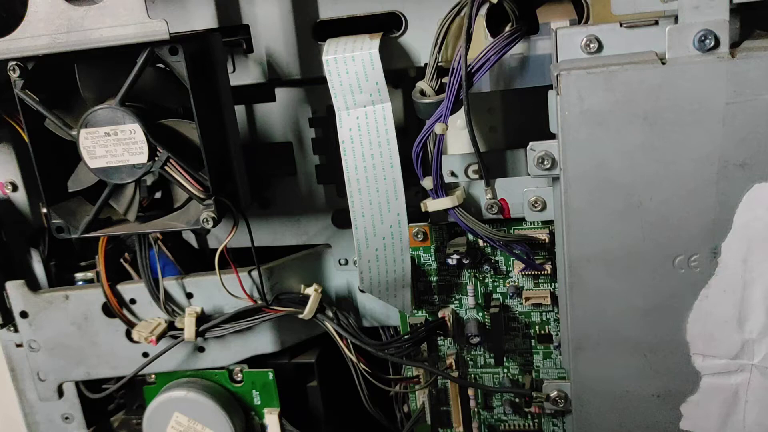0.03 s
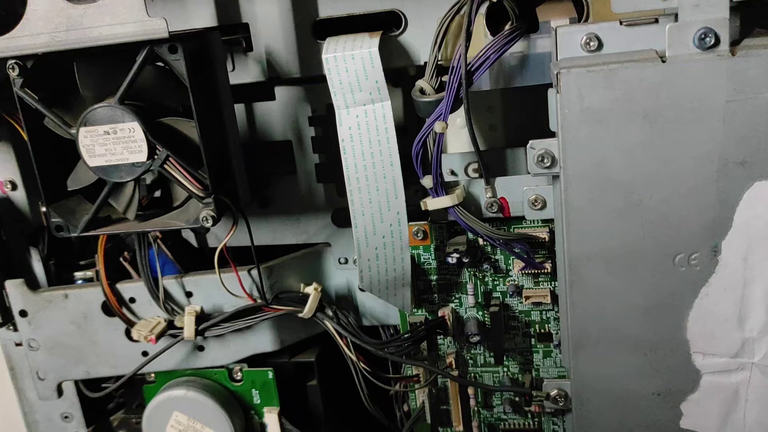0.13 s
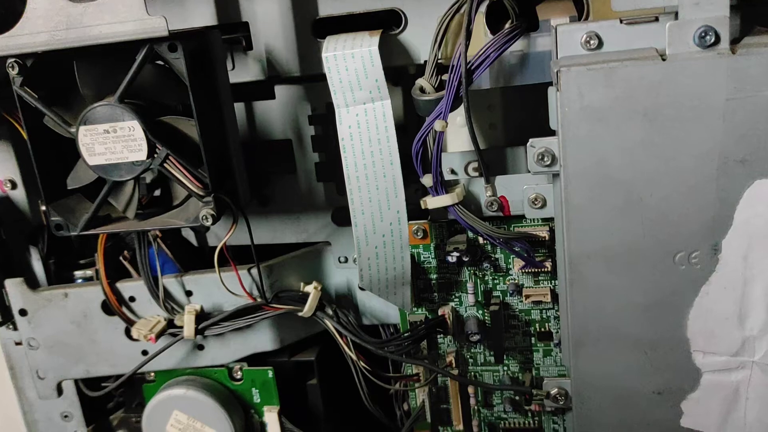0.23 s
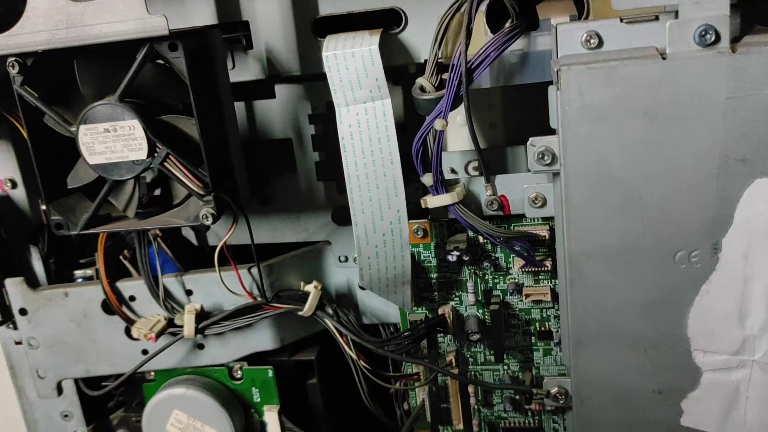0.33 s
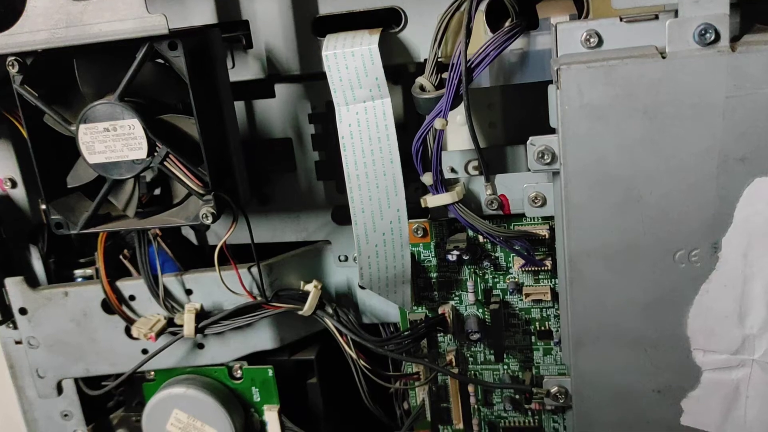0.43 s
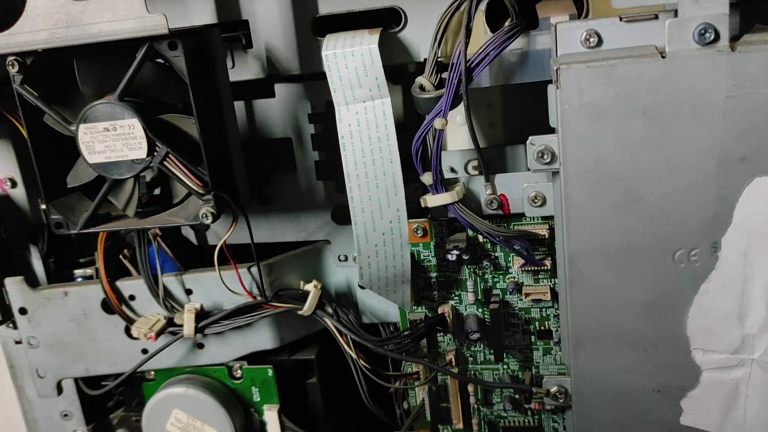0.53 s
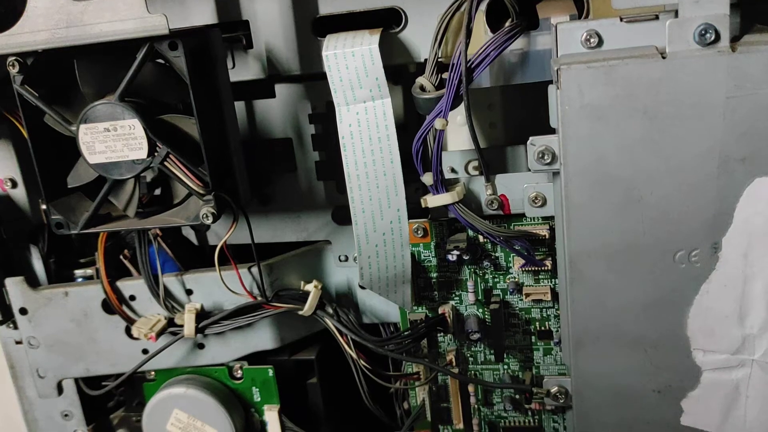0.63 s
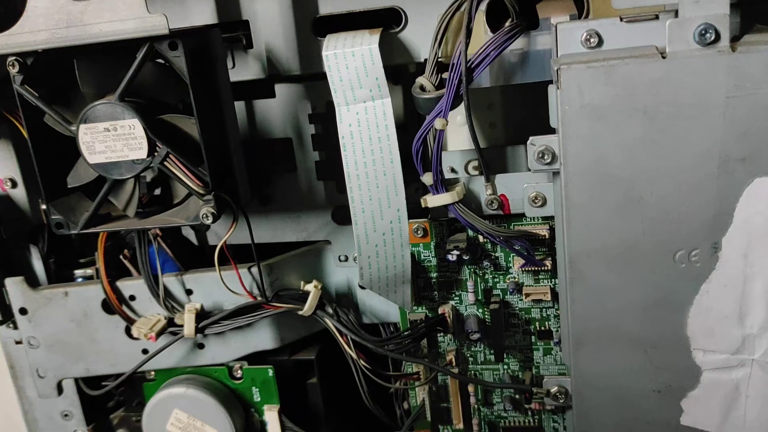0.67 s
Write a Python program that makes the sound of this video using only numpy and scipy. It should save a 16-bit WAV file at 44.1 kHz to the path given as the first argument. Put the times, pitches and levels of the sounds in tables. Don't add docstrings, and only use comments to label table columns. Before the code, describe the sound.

One loud mechanical clack with a brief dull shudder, then sparse ticks, soft taps and rubbing, a short rough slide with a bright click and hollow knocks, over steady fan hiss, heard close in a room.

```python
import sys
import numpy as np
from scipy import signal
from scipy.fft import rfft, irfft, next_fast_len
from scipy.io import wavfile
from scipy.ndimage import uniform_filter1d, map_coordinates

SR = 44100
rng = np.random.default_rng(int(sys.argv[2]) if len(sys.argv) > 2 else 0)


def rack_gain(trim_db):
    fader = np.asarray(trim_db, float)
    return 10 ** (fader / 20)


def wav_record(signal):
    frames = np.transpose(np.atleast_2d(signal))
    bounded = np.clip(frames, -1, 1)
    quanta = np.round(bounded * 32767).astype(np.int16)
    wavfile.write(sys.argv[1], SR, quanta)


N = 94815
T = np.arange(N) / SR
SHORT = np.arange(SR // 4) / SR

# frequency in Hz, gain in dB.
LEFT_PORT = [(300, -8), (2600, -5.5), (3800, -25), (6200, -23.5), (7600, -7.5), (9200, -2.5),
             (10300, -26.5), (15000, -32.5)]
RIGHT_PORT = [(300, -10), (3200, -17), (4200, -17.5), (6600, -7), (7600, 2), (8500, -8.5), (10200, -31),
              (15000, -32.5)]
# frequency in Hz, left-right correlation from 0 to 1.
PORT_LIKENESS = [(60, 0.86), (290, 0.67), (640, 0.75), (1400, 0), (15000, 0.12)]
# frequency in Hz, level in dB.
FAN_LEFT = [(40, 2.5), (200, 4.5), (2400, -11.5), (5600, -30.5), (6400, -17.5), (9000, -19.5), (11000, -13),
            (15000, -27.5)]
FAN_RIGHT = [(40, 7.5), (250, -5.5), (4800, -20.5), (6700, 0.5), (9800, -22), (11200, -9), (12600, -25.5),
             (15000, -23)]
# frequency in Hz, level in dB.
BLADE_TONES = [
    (163, -73.5),
    (330, -73.5),
    (500, -81),
]
# start in seconds, length in seconds, level in dB, dull share in dB, left-right in dB.
RUBS = [(0.12, 0.038, -70.5, 1, 20.5), (0.173, 0.063, -54, -2, 5), (0.282, 0.07, -56, 4, 0.5),
        (.455, 0.039, -57, 4, 3), (0.721, 0.015, -52.5, 0.5, 1.5), (0.76, 0.023, -49, -5, 2),
        (0.812, 0.016, -56.5, 14.5, -1), (0.915, 0.01, -61.5, 6.5, 2), (1.024, 0.052, -70.5, 11, 5.5),
        (1.084, 0.015, -59.5, 3, 3.5), (1.121, 0.077, -57.5, 4, -0.5), (1.252, 0.082, -61.5, 3.5, 2.5),
        (1.315, 0.028, -54.5, 3, 1.5), (1.394, 0.046, -53.5, 1, 0), (1.465, 0.087, -57.5, 3.5, 1),
        (2.058, 0.12, -59.5, 6, -0.5)]
# start in seconds, peak in dB, dull share in dB, left-right in dB.
TICKS = [(.7271, -44, -8, 8), (.771, -47, -15, 4), (0.8163, -43, -0.5, -12), (1.0824, -37.5, -31, 12),
         (1.1248, -33.5, -8, -5), (1.179, -53, 0, -7), (1.321, -41, -6, -3), (1.4106, -36.5, -3, -2),
         (1.477, -41.5, -8, -6), (1.493, -36, -8.5, 6.5), (1.7902, -21, -29, 4), (1.847, -29.5, -1.5, -12),
         (2.1034, -40.5, -18, -6)]
# start in seconds, peak in dB, pitch in Hz.
TAPS = [(.82, -46, 2500), (1.412, -43.5, 2296), (1.514, -46, 1994)]
# time in seconds, effort in dB.
SLIDE = [
    (1.64, -77),
    (1.68, -54),
    (1.72, -48.5),
    (1.77, -44.5),
    (1.82, -39.5),
    (1.855, -38.5),
    (1.881, -47),
    (1.93, -58),
]
# frequency in Hz, gain in dB.
SLIDE_COLOUR = [(150, -2.5), (320, 9), (650, 1.5), (1200, -2), (3400, -1.5), (4200, 6.5), (6500, 2.5),
                (15000, -2.5)]
# start in seconds, peak in dB.
THUDS = [
    (1.715, -58),
    (1.834, -46.5),
    (1.845, -45.5),
    (1.856, -44.5),
]
# frequency in Hz, level in dB, 60 dB decay in seconds.
HOLLOW = [(303.6, 5, 0.048), (347, -2, 0.073), (510, 2, 0.053), (167, -7, 0.067)]
# start in seconds, peak in dB, 60 dB decay in seconds.
CATCH = [
    (0.4907, -23, 0.019),
    (0.4919, -14, 0.014),
    (0.4971, -24.5, 0.019),
    (0.504, -32, 0.011),
]
# frequency in Hz, gain in dB.
CRACK_COLOUR = [(200, -20), (1500, -1.5), (2800, 0.5), (4600, 1.5), (6600, -3), (8000, -1.5), (15000, -2.5)]
# frequency in Hz, level in dB, 60 dB decay in seconds.
CASING = [(327, -46, .15), (606, -40.5, 0.057), (1115, -39.5, 0.039), (1533, -43, 0.031),
          (2718, -29, 0.016), (4400, -36, .015), (7397, -40, 0.036), (8850, -38, 0.019), (8750, -45, 0.023),
          (73, -57, 0.21)]
# frequency in Hz, 60 dB decay in seconds.
ROOM = [(150, 1), (1000, 0.56), (3000, 0.53), (8000, 0.36), (14000, 0.13)]
# size in full scale, first and second blocking corner in Hz.
BIAS = [(.15, 1.37, .12), (.079, 1.33, .39)]
TRIMS = [.1659, .2259, .2659, .3259]
TRIM_SIZE = [
    [.011],
    [.0055],
]

BLADE_UNSTEADY_DB = 2
FAN_DB, FAN_SWELL_DB, FAN_PATCH_DB = -60.5, 1.9, 1.5
RUB_RISE_S, RUB_FALL_S, RUB_ROUGH_DB = .012, .015, 1.8
DULL_HZ = 4370
TICK_T60, TICK_RISE_S = 0.018, .0012
KNOCK_HZ, KNOCK_WIDTH_HZ, KNOCK_DB = 2090, 960, 6.5
TAP_T60, TAP_SPREAD = 0.03, 0.066
SHUDDER_DB, SHUDDER_T60, SHUDDER_RISE_S, SHUDDER_HZ = -32.5, 0.41, 0.0068, 2500
ROOM_DB = -5
BIAS_S, CHARGE_S = .146, .116
TRIM_EDGE_S, TRIM_RECOVER_S = 0.0001, .03
WAKE_S, RUMBLE_S, RUMBLE_HZ = .105, 0.1176, 507


def unit(x):
    return x / np.sqrt(np.mean(x ** 2) + 1e-20)


def along(points, hz):
    f, v = np.transpose(points)
    return np.interp(np.log(hz + 1), np.log(f + 1), v)


def wobble(rate):
    knots = rng.standard_normal(int(N * rate / SR) + 4)
    return map_coordinates(knots, [T * rate])


def filtered(x, response):
    m = next_fast_len(N + SR // 2)
    return irfft(rfft(x, m) * response(np.fft.rfftfreq(m, 1 / SR)), m)[..., :N]


def placed(s, shape):
    out = np.zeros(shape.shape[:-1] + (N + SR,))
    out[..., round(s * SR):][..., :shape.shape[-1]] = shape
    return out[..., :N]


def pair(patchy_db):
    z = signal.stft(rng.standard_normal((2, N)), nperseg=512)[2]
    field = rng.standard_normal(z.shape[1:])
    field = uniform_filter1d(uniform_filter1d(field, 6, 0), 8, 1)
    two = signal.istft(z * rack_gain(patchy_db * unit(field)), nperseg=512)[1][:, :N]

    def mid_side(hz):
        turn = np.arccos(np.clip(along(PORT_LIKENESS, hz), -1, 1)) / 2
        return np.array([np.cos(turn), np.sin(turn)])

    mid, side = filtered(two, mid_side)
    return unit(np.array([mid + side, mid - side]))


def dying(db, t60, rise_s):
    return rack_gain(db - 60 * SHORT / abs(t60)) * (1 - np.exp(-SHORT / abs(rise_s)))


def ring(s, db, modes):
    chance = rng.normal(0, 1, (2, len(modes), 2, 1))
    total = 0
    for (hz, level, t60), a, b in zip(modes, *chance):
        envelope = dying(db + level + 2.0 * a, t60, 0.0028)
        total = total + envelope * np.sin(2 * np.pi * hz * SHORT + 0.24 * b)
    return placed(s, total)


def voiced(events):
    noise = pair(patchy_db=4.5)
    dull = filtered(noise, lambda hz: 1 / (1 + (hz / DULL_HZ) ** 4))
    gains = 0
    for s, envelope, dull_db, pan_db in events:
        ports = envelope * rack_gain([[pan_db / 2], [-pan_db / 2]])
        gains = gains + placed(s, ports * rack_gain([[[0]], [[dull_db]]]))
    bright_gain, dull_gain = gains
    return bright_gain * (noise - dull) + dull_gain * dull


def fan():
    air = filtered(pair(FAN_PATCH_DB), lambda hz: rack_gain([along(FAN_LEFT, hz), along(FAN_RIGHT, hz)]))
    tones = 0
    for hz, db in BLADE_TONES:
        level = rack_gain(db + BLADE_UNSTEADY_DB * wobble(25.18))
        tones = tones + level * np.sin(2 * np.pi * hz * T + 1.05 * wobble(15))
    return rack_gain(FAN_DB + FAN_SWELL_DB * wobble(7.4)) * unit(air) + tones * rack_gain([[2.5], [-2.5]])


def rubs():
    def stroke(length):
        return np.clip(SHORT / RUB_RISE_S, 0, 1) * np.exp(-np.clip(SHORT - length, 0, None) / RUB_FALL_S)

    noise = voiced([(s, rack_gain(db) * stroke(length), dull, pan) for s, length, db, dull, pan in RUBS])
    return noise * rack_gain(RUB_ROUGH_DB * wobble(150))


def ticks():
    def knock(hz):
        treble = (hz / KNOCK_HZ) ** 2 / (1 + (hz / KNOCK_HZ) ** 2)
        return treble + rack_gain(KNOCK_DB) / (1 + (2 * (hz - KNOCK_HZ) / KNOCK_WIDTH_HZ) ** 2)

    bursts = voiced([(s, dying(db, TICK_T60, TICK_RISE_S), dull, pan) for s, db, dull, pan in TICKS])
    return filtered(bursts, knock)


def taps():
    return sum(ring(s, db, [(hz, 0, TAP_T60), (hz * (1 + TAP_SPREAD), -3, TAP_T60)]) for s, db, hz in TAPS)


def carriage():
    s, db = np.transpose(SLIDE)
    stutter_db = 1.0 * wobble(200) + 0.8 * wobble(39.95)
    effort = rack_gain(np.interp(T, s, db, left=-120, right=-120) + stutter_db)
    friction = filtered(pair(patchy_db=3.5), lambda hz: rack_gain(along(SLIDE_COLOUR, hz)))
    knocks = sum(ring(s, db + 5.5, HOLLOW) for s, db in THUDS)
    return effort * friction + knocks


def catch():
    s = CATCH[0][0]
    contacts = sum(placed(s, dying(db, t60, 0.00079)) for s, db, t60 in CATCH)
    crack = filtered(contacts * pair(patchy_db=3.0), lambda hz: rack_gain(along(CRACK_COLOUR, hz)))
    panels = filtered(pair(patchy_db=4.5), lambda hz: 1 / (1 + (hz / SHUDDER_HZ) ** 2))
    shudder = placed(s, dying(SHUDDER_DB, SHUDDER_T60, SHUDDER_RISE_S)) * panels
    return crack + ring(s, 4.8, CASING) + shudder


def room(x):
    hz, t, z = signal.stft(rng.standard_normal((2, SR // 2)), SR, nperseg=256)
    tail = signal.istft(z * rack_gain(-60 * t / along(ROOM, hz)[:, None]), SR, nperseg=256)[1]
    tail = tail / np.linalg.norm(tail[0])
    late = np.pad(x, ((0, 0), (200, 0)))
    return signal.fftconvolve(late, tail, axes=1)[:, :N]


def scene():
    blow = catch()
    rest = ticks() + rubs() + taps() + carriage()
    heard = blow + rack_gain(ROOM_DB) * room(blow) + rest + rack_gain(ROOM_DB - 9) * room(rest)
    at_ports = filtered(heard, lambda hz: rack_gain([along(LEFT_PORT, hz), along(RIGHT_PORT, hz)]))
    return rack_gain(9.5) * at_ports + fan()


def bias():
    rows = []
    for size, *corners in BIAS:
        row = size * (1 - np.exp(-np.clip(T - BIAS_S, 0, None) / CHARGE_S))
        for hz in corners:
            row = signal.lfilter([1, -1], [1, -np.exp(-2 * np.pi * hz / SR)], row)
        rows.append(row)
    trims = sum(np.tanh((T - s) / TRIM_EDGE_S) * np.exp(-np.abs(T - s) / TRIM_RECOVER_S) for s in TRIMS)
    return (np.array(rows) - np.array(TRIM_SIZE) * trims / 2) * np.clip((T - BIAS_S) * 100, 0, 1)


def low_pass(x):
    return signal.sosfilt(signal.butter(12, 15200, fs=SR, output="sos"), x)


def record(dry):
    bass = filtered(dry, lambda hz: 1 / (1 + (hz / RUMBLE_HZ) ** 2))
    treble_gate = np.clip((T - WAKE_S) / 0.0047, 0, 1)
    bass_gate = np.clip((T - RUMBLE_S) / 0.0056, .1, 1) * (T > WAKE_S)
    woken = (dry - bass) * treble_gate + bass * bass_gate
    return low_pass(woken + bias())


dry = scene()
out = record(dry)
wav_record(out)
```